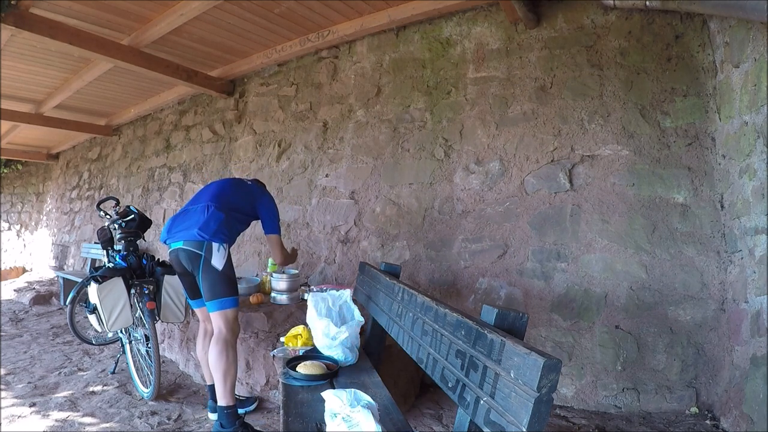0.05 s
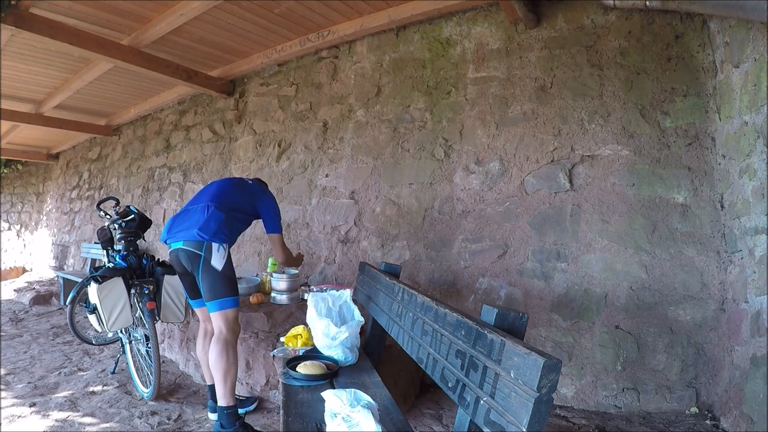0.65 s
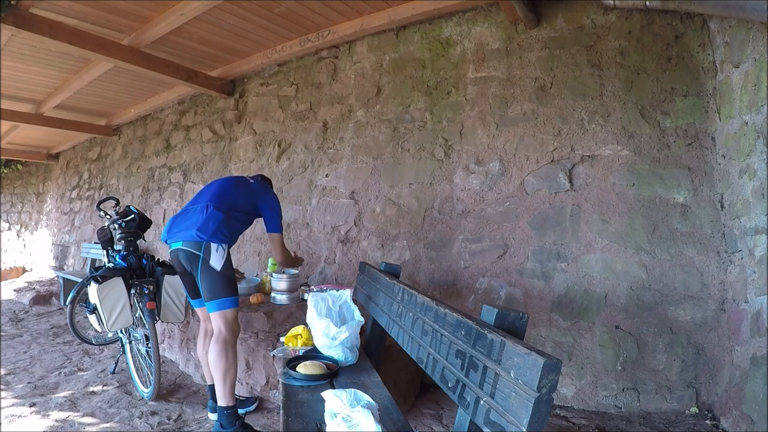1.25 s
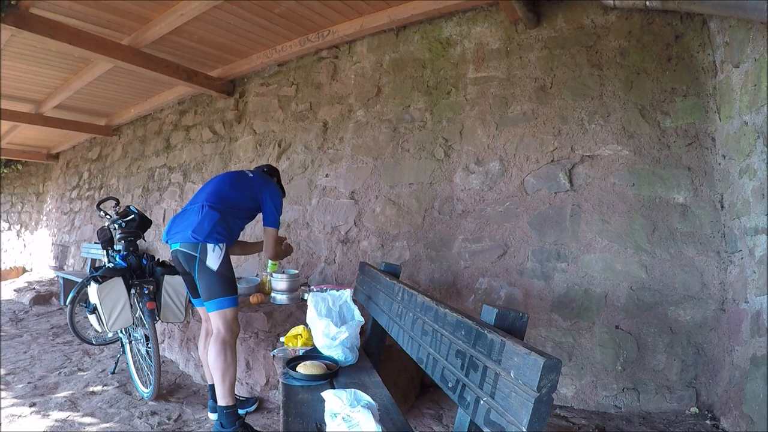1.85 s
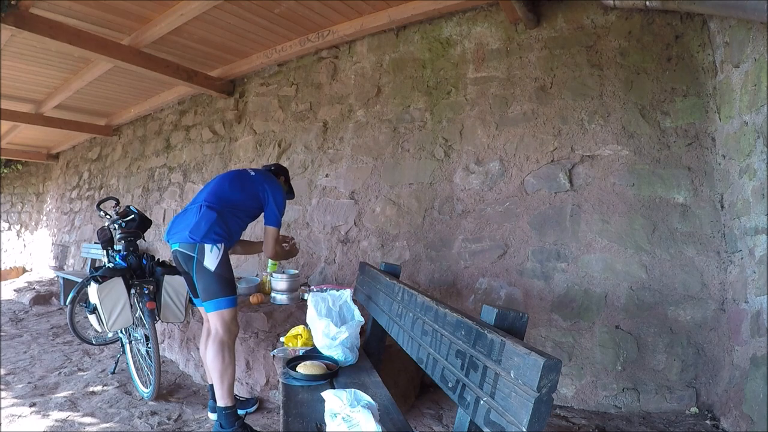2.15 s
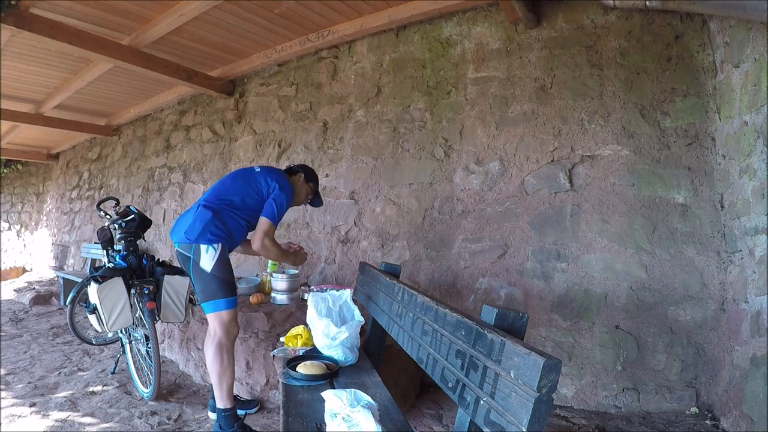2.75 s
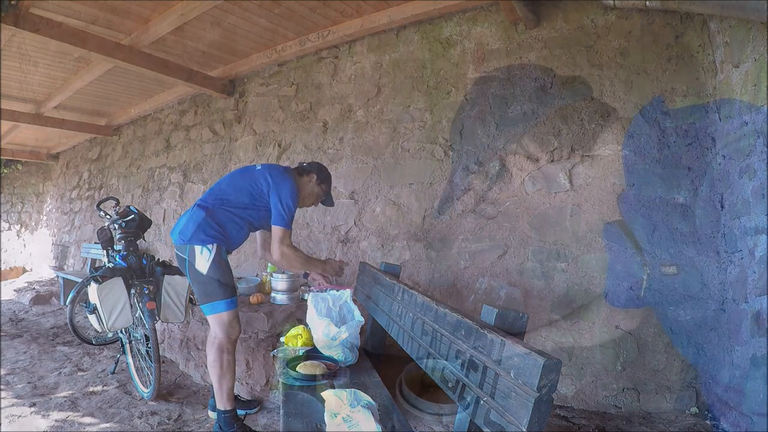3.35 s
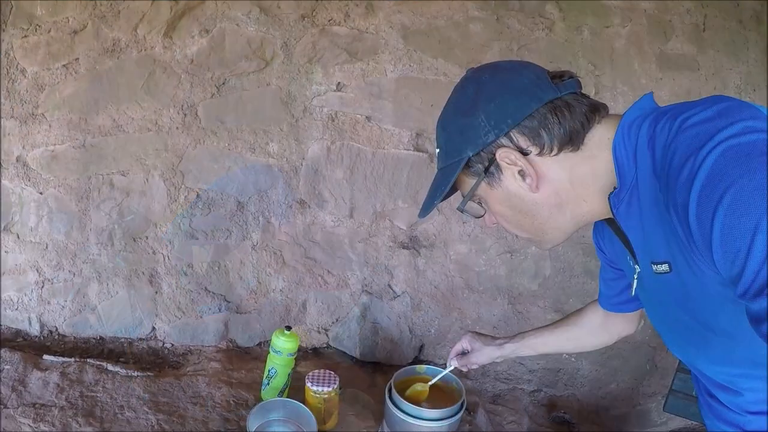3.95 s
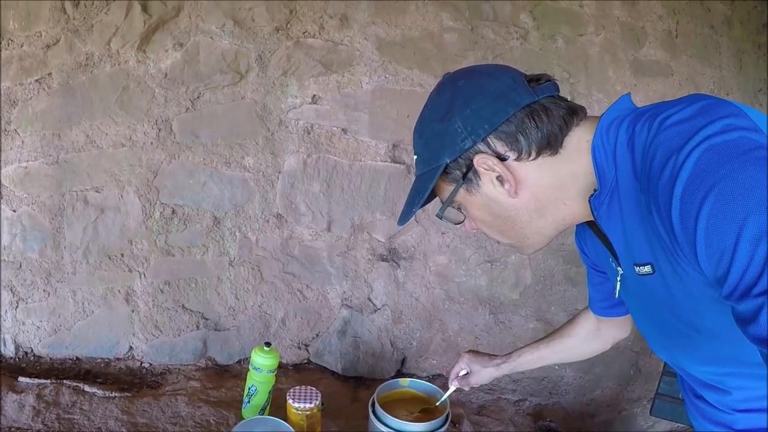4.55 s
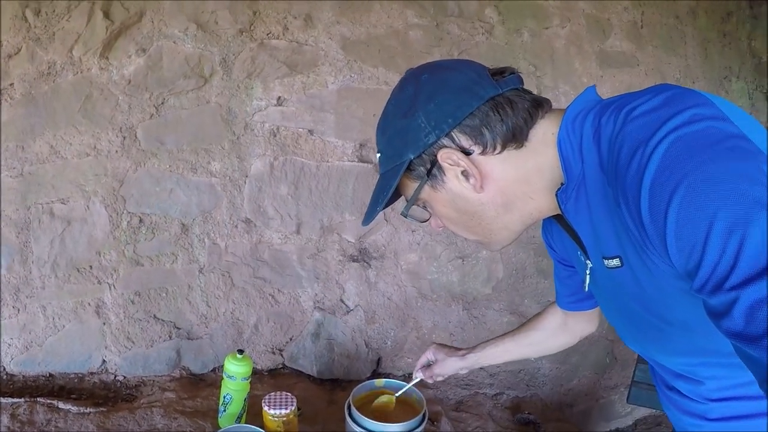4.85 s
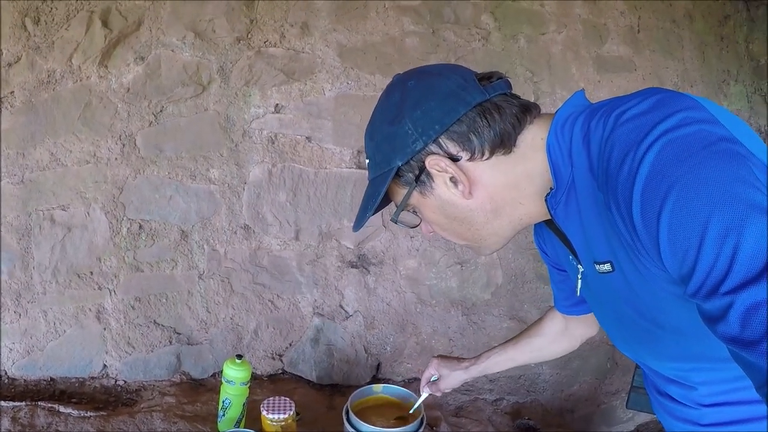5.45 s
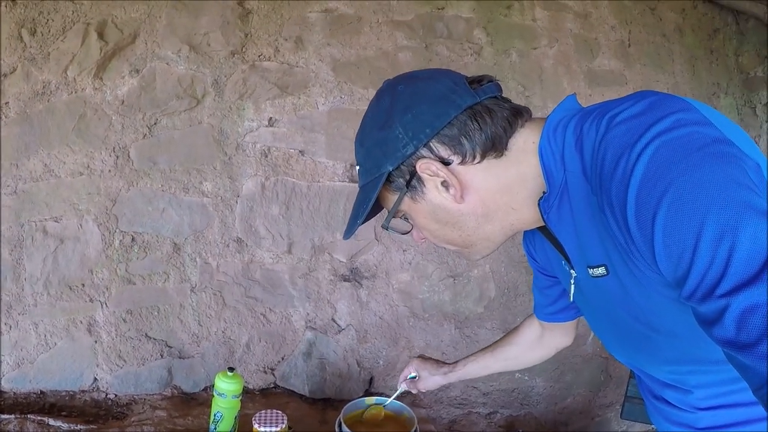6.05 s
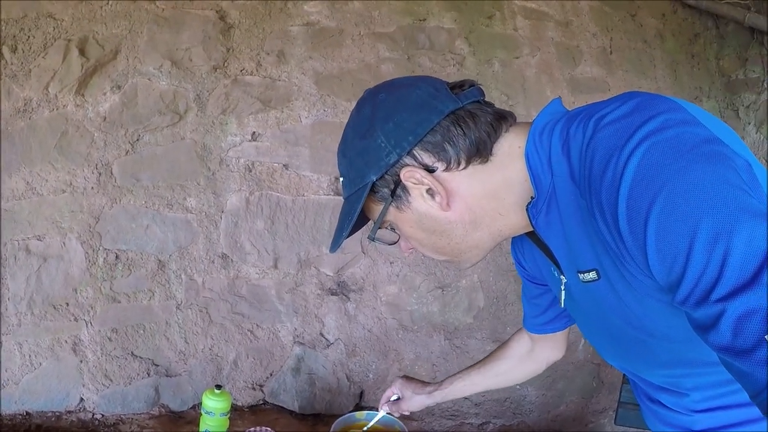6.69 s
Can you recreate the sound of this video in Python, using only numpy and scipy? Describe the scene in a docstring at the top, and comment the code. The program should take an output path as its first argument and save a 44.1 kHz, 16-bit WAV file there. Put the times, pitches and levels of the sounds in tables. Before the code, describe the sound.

Thick soup boils in a metal pot on a camping gas stove under an open stone shelter. Close to the microphone, bubbles glug and plop, small ones snap at the surface, and the flame rumbles low. A little past halfway, the sound shifts to a more distant position with a brief sizzle. The boil is now softer and hollower, and a spoon scrapes, sloshes and lightly knocks the pot.

```python
"""Soup boiling in a metal pot on a camping gas stove, under an open stone shelter.
With the microphone beside the pot, steam bubbles glug through the thick liquid, small ones snap at the
surface and ring the metal, and the flame rumbles below. A more distant position fades in and the close
one is cut off. From back there the stone blurs the boil, and a spoon scrapes, sloshes and knocks."""
import sys
import numpy as np
from scipy import signal
from scipy.fft import rfft, irfft, next_fast_len
from scipy.io import wavfile
from scipy.ndimage import uniform_filter1d, map_coordinates

SR = 44100
rng = np.random.default_rng(int(sys.argv[2]) if len(sys.argv) > 2 else 0)


def to_wav(s):
    """Save 16-bit WAV."""
    ch = np.atleast_2d(s).T  # columns
    pcm = np.round(np.clip(ch, -1, 1) * 32767)  # PCM
    wavfile.write(sys.argv[1], SR, pcm.astype(np.int16))


N = 296352
TIME = np.arange(N) / SR
FAR_IN_S, FAR_FULL_S, CLOSE_CUT_S = 3.1, 3.95, 4.156
TOP_HZ = 15600

# Loud steam bubbles. Each row: start in seconds, level in dB, starting pitch in Hz,
# rise in starting pitches per second, life in seconds.
STEAM_BUBBLES = [(0.118, -32.5, 524.4, 7, 0.0202), (0.143, -24, 373.2, 29, 0.018),
                 (0.159, -35, 466.5, 4.5, 0.019), (0.19, -23, 640, 61.5, 0.0036),
                 (0.205, -34.5, 860, 10.5, 0.0095), (0.205, -23.5, 459.6, 11, 0.015),
                 (0.277, -30.5, 478, 19, 0.0073), (0.289, -28.5, 394.5, 35.5, 0.015),
                 (0.308, -28, 509, 54.5, 0.0051), (0.337, -33.5, 441, 28, 0.0087),
                 (0.393, -29.5, 408, 38.5, 0.0183), (0.423, -27, 458, 4, 0.0146),
                 (0.466, -34.5, 626, 31.5, 0.0185), (0.511, -27.5, 431, 0.5, 0.0175),
                 (0.58, -35, 542.3, 5.5, 0.0217), (0.599, -35, 1298, 5.5, 0.0091),
                 (0.615, -35.5, 447, 4.5, 0.0163), (0.659, -31, 449, 14.5, 0.0154),
                 (0.796, -21, 508, 54.5, 0.00537), (0.908, -27.5, 433.7, 2, 0.0176),
                 (0.949, -30.5, 449, 18, 0.0151), (0.989, -19.5, 642, 14.5, 0.00285),
                 (1.001, -25.5, 368.5, 20.5, 0.0209), (1.026, -42, 452, 8, 0.02),
                 (1.085, -32, 540, 1, 0.0093), (1.096, -31, 415.7, 9.5, 0.0172),
                 (1.142, -33.5, 450.6, 13, 0.0178), (1.193, -31.5, 398, 48.5, 0.0079),
                 (1.266, -32, 603, 58.5, 0.0069), (1.274, -25.5, 586.5, 2, 0.0064),
                 (1.279, -37, 432, 12, 0.019), (1.335, -24, 383.4, 27, 0.01475),
                 (1.437, -24.5, 552, 16, 0.0064), (1.445, -35, 410.4, 3, 0.029),
                 (1.53, -33.5, 413, 2, 0.0266), (1.576, -30.5, 454, 2.5, 0.0076),
                 (1.635, -29.5, 389.4, 1.5, 0.0099), (1.654, -33.5, 561.3, 26.5, 0.0119),
                 (1.682, -35.5, 549.7, 0, 0.0247), (1.69, -26, 394.4, 20.5, 0.0154),
                 (1.712, -35, 564, 41, 0.0115), (1.753, -24, 431, 58.5, 0.0058),
                 (1.823, -38, 498, 5, 0.031), (1.882, -30, 543.6, 14, 0.0161),
                 (1.907, -19, 537, 54.5, 0.00222), (1.924, -32.5, 430, 30, 0.0217),
                 (2.038, -32.5, 470, 17.5, 0.0071), (2.089, -26, 416.6, 3.5, 0.019),
                 (2.23, -24.5, 340.2, 25, 0.0192), (2.25, -27.5, 764, 14.5, 0.0096),
                 (2.262, -37.5, 1083, 17, 0.011), (2.35, -27.5, 326, 20.5, 0.0069),
                 (2.356, -23, 504, 6.5, 0.0097), (2.37, -20.5, 467, 4.5, 0.00427),
                 (2.377, -39, 845, 32, 0.0123), (2.423, -18.5, 583, 1.5, 0.00239),
                 (2.445, -28, 480, 55, 0.0051), (2.523, -24, 521, 2, 0.009),
                 (2.593, -29, 340.2, 27, 0.0212), (2.651, -29.5, 479, 6.5, 0.0086),
                 (2.67, -25, 815, 34.5, 0.00374), (2.724, -26.5, 513, -1.5, 0.0046),
                 (2.745, -37, 407, 26, 0.0446), (2.78, -38.5, 491, 1, 0.0194),
                 (2.823, -36.5, 638.5, 3.5, 0.023), (2.827, -39, 1214, 15, 0.0164),
                 (2.857, -41, 1273, 1.5, 0.007), (2.904, -29, 536, 29.5, 0.0145),
                 (2.918, -30, 729, 21, 0.0092), (2.933, -22, 521, 19, 0.00325),
                 (2.959, -28.5, 857, 7, 0.0048), (2.96, -30.5, 497, 20, 0.0091),
                 (3.02, -37, 1264, 5, 0.0102), (3.07, -29.5, 552, 31.5, 0.0096),
                 (3.084, -27, 420, 46.5, 0.0058), (3.107, -35.5, 574, 64, 0.0092),
                 (3.217, -35.5, 883, 0, 0.0045), (3.217, -19.5, 634, -4, 0.00474),
                 (3.223, -38, 359, 17.5, 0.015), (3.274, -33, 380, 57, 0.007), (3.283, -30, 430, 4, 0.0146),
                 (3.311, -39, 815.4, -2, 0.0218), (3.352, -28, 556.5, 0, 0.0097),
                 (3.402, -26, 523, -3.5, 0.0119), (3.421, -36, 344, 19.5, 0.0198),
                 (3.489, -33.5, 454, 14.5, 0.0166), (3.583, -34, 430, 14.5, 0.016),
                 (3.584, -33, 838, 4.5, 0.011), (3.626, -33.5, 494.3, 2, 0.021),
                 (3.664, -33.5, 448, 12, 0.0062), (3.69, -28.5, 416.7, 14.5, 0.0128),
                 (3.726, -29, 454, 54, 0.0044), (3.748, -27, 716, 54.5, 0.0035),
                 (3.752, -35.5, 423.5, 9, 0.0163), (3.788, -38.5, 835, -4.5, 0.0082),
                 (3.79, -18.5, 479.4, 2.5, 0.00635), (3.8, -39.5, 548, 21, 0.013),
                 (3.817, -29, 592, 8, 0.0092), (3.824, -39.5, 382.2, 9, 0.053),
                 (3.864, -33.5, 434, 10, 0.012), (3.922, -26, 561, -0.5, 0.0064),
                 (4.029, -29.5, 469, 29.5, 0.0063), (4.048, -28.5, 420.3, 4, 0.0178),
                 (4.112, -33, 498, -13, 0.008), (4.132, -29, 448, 15.5, 0.0106),
                 (4.309, -40, 486.2, 2.5, 0.0212), (4.66, -40.5, 404.6, -0.5, 0.0134),
                 (4.806, -41.5, 408, 4.5, 0.0275), (5.359, -40, 674, 3.5, 0.0187),
                 (5.856, -39.5, 475.5, 6.5, 0.0113), (5.93, -46.5, 475, 9.5, 0.0284),
                 (6.015, -39.5, 431.6, 8.5, 0.0144), (6.197, -43.5, 737, -0.5, 0.018),
                 (6.603, -41.5, 523, 15.5, 0.011)]
# Slow bubbles swelling up through the soup, then steam squeaking out through a shrinking film.
# Each row: start in seconds, peak in dB, starting pitch in Hz, end pitch in Hz, length in seconds.
SLOW_BUBBLES = [(0.088, -36.5, 376.7, 477, 0.0444), (0.192, -36, 343.7, 574, 0.05),
                (0.419, -41, 382, 476, 0.06), (0.459, -32, 441.6, 561, 0.036),
                (0.53, -39, 393, 667, 0.0323), (0.588, -38, 426, 962, 0.0435),
                (0.737, -37, 408.7, 744, 0.0655), (0.916, -41, 347.5, 786, 0.0328),
                (0.987, -42, 466, 577, 0.054), (1.212, -38.5, 350, 594, 0.035),
                (1.282, -40.5, 393.3, 668, 0.051), (1.493, -38, 496, 1033, 0.0337),
                (1.81, -35.5, 412, 527.2, 0.0676), (1.808, -42.5, 504.7, 647, 0.042),
                (1.923, -40.5, 444.7, 794, 0.0378), (2.08, -67, 329, 567, 0.057),
                (2.162, -41, 340.1, 673, 0.087), (2.303, -43, 349.3, 715, 0.0747),
                (2.534, -43.5, 523.8, 893.6, 0.073), (2.59, -40, 543.2, 699, 0.061),
                (2.786, -42, 348.3, 702.6, 0.069), (3.18, -38.5, 386.7, 788, 0.0454),
                (3.232, -33.5, 360.3, 729, 0.0505), (3.279, -38.5, 472.8, 581.7, 0.073),
                (3.282, -39.5, 332.4, 418, 0.045), (3.471, -36.5, 401.5, 564.5, 0.0703)]
STEAM_SQUEAKS = [(.66, -44, 3800, 4900, .062), (1.262, -44.5, 2200, 3900, .072)]
# Films bursting close by. Each row: start in seconds, snap in dB, snap centre in Hz,
# splash in dB, spray in dB.
CLOSE_BURSTS = [(0.041, -39, 4460, -49, -46.5), (0.1007, -45.5, 3430, -54.5, -57),
                (0.1245, -52.5, 6000, -60.5, -61.5), (0.141, -43, 6040, -61.5, -55.5),
                (0.1893, -48, 3250, -58, -73.5), (0.2049, -44, 3830, -60.5, -59.5),
                (0.2365, -43.5, 3680, -53, -71), (0.375, -45.5, 2700, -64.5, -45),
                (0.3905, -39, 3570, -67.5, -53.5), (0.404, -50, 3800, -58.5, -49),
                (0.4638, -52.5, 5970, -52.5, -46), (0.5102, -42.5, 4080, -52.5, -55),
                (0.5362, -42, 2920, -65, -53), (0.562, -48.5, 5000, -65.5, -51),
                (0.6, -48.5, 3260, -56, -54), (0.6165, -40.5, 3030, -50.5, -46.5),
                (0.6573, -34.5, 3970, -49, -64), (0.7397, -44.5, 4830, -71.5, -72),
                (0.7946, -48, 3260, -54.5, -59.5), (0.855, -47.5, 5500, -59.5, -67),
                (0.894, -44.5, 3500, -70, -50.5), (0.9876, -48, 3850, -45.5, -56),
                (1.046, -70, 3900, -64, -53), (1.083, -56.5, 3380, -50, -53),
                (1.094, -46, 3450, -64.5, -49), (1.1365, -43, 3920, -61, -49.5),
                (1.1816, -47, 3110, -52.5, -64), (1.263, -41.5, 2310, -65.5, -60),
                (1.3179, -50.5, 3420, -70.5, -71), (1.3628, -44, 5420, -61.5, -67),
                (1.398, -47.5, 4440, -63.5, -61.5), (1.4355, -43, 3100, -50.5, -56),
                (1.5314, -47.5, 5490, -48, -52), (1.5932, -48, 3620, -58, -57),
                (1.6143, -40, 3205, -63.5, -50), (1.634, -63.5, 4500, -68.5, -49),
                (1.729, -51, 2760, -65.5, -57.5), (1.7908, -47.5, 3320, -51, -66),
                (1.8238, -47.5, 3410, -62, -52.5), (1.85, -46.5, 3320, -49.5, -57),
                (1.9639, -48, 2620, -51.5, -54.5), (2.0878, -44, 4150, -55, -55),
                (2.174, -43.5, 3250, -64, -50), (2.228, -44.5, 3830, -49.5, -58.5),
                (2.251, -43.5, 3300, -52, -78), (2.2957, -54, 3930, -51, -51),
                (2.3258, -43.5, 3270, -64.5, -58), (2.3989, -63, 3360, -59, -57),
                (2.4219, -46.5, 2810, -46, -58.5), (2.4785, -43, 3110, -51.5, -61.5),
                (2.523, -52, 2980, -47, -70.5), (2.5561, -53, 4310, -54, -53),
                (2.6489, -50, 3200, -56.5, -53), (2.6801, -42, 4080, -69.5, -73.5),
                (2.7237, -59.5, 3080, -54.5, -61), (2.857, -41.5, 3460, -49, -52),
                (2.958, -47.5, 3530, -53.5, -49.5), (3.0355, -49.5, 3950, -67, -54),
                (3.1058, -51.5, 3270, -67, -69.5), (3.1837, -41, 2990, -51, -77.5),
                (3.2168, -44.5, 3380, -49.5, -48.5), (3.4017, -46.5, 3270, -50.5, -56),
                (3.5573, -44.5, 4300, -63, -65.5), (3.7509, -43.5, 6120, -64.5, -66.5),
                (3.9569, -45.5, 3540, -59.5, -60.5), (4.019, -44, 3500, -65, -68),
                (4.047, -58, 4500, -68, -51), (4.146, -46, 4800, -62, -67)]
# Films bursting farther off. Each row: start in seconds, snap in dB, snap centre in Hz, spray in dB.
FAR_BURSTS = [(4.2804, -55, 6200, -59.5), (4.3964, -52, 6970, -69.5), (4.4511, -51, 3190, -57.5),
              (4.5115, -47.5, 3950, -71), (4.5496, -50.5, 5400, -67), (4.642, -51.5, 4520, -56.5),
              (4.751, -48.5, 4630, -64.5), (4.8, -55.5, 4980, -58), (4.8342, -54, 2790, -54.5),
              (4.992, -57, 3400, -59), (5.0374, -60, 4870, -55), (5.0894, -66.5, 2310, -67.5),
              (5.1502, -47.5, 4140, -62), (5.243, -55.5, 7280, -64.5), (5.2566, -41.5, 4170, -56),
              (5.744, -51, 3620, -63.5), (5.7689, -52, 3390, -69), (5.8395, -49.5, 3810, -60),
              (5.9076, -49.5, 6200, -71.5), (5.9542, -49.5, 2860, -52.5), (6.0571, -58, 4380, -60.5),
              (6.101, -54, 2320, -59.5), (6.502, -48.5, 5600, -63)]
# Spectra of the simmer and of the spray, close and far. Each row: frequency in Hz, relative level in dB.
SIMMER_SPECTRUM = [(110, -30), (160, 0), (220, -14), (290, -2), (480, 5), (800, 1), (1300, -7),
                   (1800, -11.5), (3300, -14), (6000, -20.5), (10000, -28), (15500, -34)]
SPRAY_SPECTRUM = [(600, -29), (1500, -5), (3500, 0.5), (6000, 6.5), (10000, -3.5), (15000, -9)]
FAR_SPRAY_SPECTRUM = [(600, -45.5), (1500, -12), (4000, 1.5), (7000, -1), (10000, -4.5), (15000, -18)]
# Modes of the pot's air and wall, then of spoon and wall damped by the soup.
# Each row: frequency in Hz, relative level in dB, seconds to fall 60 dB.
POT_MODES = [(2290, -8, .11), (2385, -6, .13), (2630, -7, .1), (2735, -5, .11), (3080, -5, .12),
             (3300, 0, .06), (3910, -2, .08), (4010, -3, .11), (4350, -4, .08), (5000, -8, .1),
             (5180, -7, .1), (5810, -8, .04)]
KNOCK_MODES = [(864, -8, 0.037), (1310, -5, 0.038), (1725, 4, 0.073), (2002, -4, 0.06), (2700, -9, 0.039),
               (3250, 3, 0.057), (5160, -11.5, .04)]
# Hollow resonances of the pot in its stone corner. Each row: centre in Hz, width in Hz, gain in dB.
HOLLOW_MODES = [(420, 41, -7.5), (508, 29.2, 1.5), (573.5, 22, 0), (696.1, 55, 3), (915, 43, 1.5),
                (963, 45, -3.5)]
# Spoon strokes. Each row: peak time in seconds, scrape in dB, swish in dB, rise and fade in seconds.
SPOON_STROKES = [(4.18, -55, -55, .03, .03), (4.52, -60, -58, .06, .15), (5.06, -52.5, -63, .08, .09),
                 (5.278, -49.5, -52, .005, .02), (5.39, -51.5, -56, .02, .04), (5.47, -57, -52.5, .06, .08),
                 (5.565, -58, -52.5, .05, .025), (6.225, -56, -55, .03, .02),
                 (6.253, -50.5, -50.5, .006, .018), (6.335, -58, -52.5, .035, .045),
                 (6.47, -58, -57, .04, .05), (6.7, -58, -56, .03, .04)]
# The spoon pushing soup about. Each row: peak time in seconds, level in dB, rise and fade in seconds.
SPOON_SLOSHES = [(4.38, -47.5, 0.0197, 0.02), (4.68, -48, 0.049, 0.053), (5.07, -64, 0.05, 0.058),
                 (5.31, -48.5, 0.0355, 0.07), (5.55, -54.5, 0.04, 0.081), (5.98, -52.5, 0.059, 0.067),
                 (6.2, -49.5, 0.019, 0.055), (6.3, -50, 0.02, 0.029), (6.46, -52, 0.0216, 0.055),
                 (6.65, -49.5, 0.0305, 0.048)]
# The spoon bumping the pot. Each row: start in seconds, level in dB.
SPOON_KNOCKS = [(5.2754, -42), (6.248, -38.5), (6.258, -41)]
# Spectra of the spoon stirring and parting the foam. Each row: frequency in Hz, relative level in dB.
STIR_SPECTRUM = [(200, -29.5), (450, -10), (950, 1.5), (1400, -3), (2000, -6.5), (4000, -20.5),
                 (8000, -43.5)]
SWISH_SPECTRUM = [(1000, -29), (2500, -0.5), (4200, 0), (6500, -0.5), (10000, -9), (15000, -26.5)]
# Resonances of the burner. Each row: centre in Hz, width in Hz, gain in dB.
BURNER_MODES = [(23, 12, -1), (35, 16, 2), (49, 11, -1), (65, 9, -1), (78, 9, -11), (101.5, 13, -4),
                (113, 16, -5), (179, 13, -14), (234, 22, -21), (263, 18, -25)]
# Spectra of the burner at a distance. Each row: frequency in Hz, relative level in dB.
RUMBLE_SPECTRUM = [(11, -9), (24, 4), (35, -4), (46, -2), (52, 6), (58, -3), (63, -2), (69, 5), (75, -6),
                   (90, -14), (118, -13), (130, -22), (150, -20), (190, -24), (210, -42), (260, -38),
                   (570, -120)]
HISS_SPECTRUM = [(120, -6.5), (250, 8.5), (340, 7), (500, -8.5), (650, 3), (950, 7.5), (1500, 5), (2400, 1),
                 (4000, -7.5), (6500, -13), (10000, -18.5), (15500, -20)]
# The distant flame's rumble. Each row: time in seconds, level in dB.
RUMBLE_LEVELS = [(4.2, -37.5), (4.6, -40), (4.9, -37.5), (5.2, -41), (5.9, -38.5), (6.15, -41.5),
                 (6.3, -39.5), (6.72, -40.5)]
# Reverberation under the stone roof. Each row: frequency in Hz, seconds to fall 60 dB.
SHELTER_DECAY = [(150, 0.684), (600, 0.1015), (3000, 0.263), (12000, 0.08)]


def glug(hz, life, rise, attack=0.000688):
    """A steam bubble opens: its cavity rings and climbs in pitch as it shrinks."""
    t = np.arange(SR // 12) / SR
    # the cavity wall trembles, which roughens small, high bubbles most
    tremble = .002 * np.cumsum(noise(len(t))) / np.sqrt(SR)
    envelope = (1 - np.exp(-t / attack)) * np.exp(-(t / life) ** 1.5)
    return envelope * np.sin(2 * np.pi * hz * (t + rise * t * t / 2 + tremble))


def glide(start_hz, end_hz, length, rough):
    """A slowly shrinking cavity: its trembling note swells, climbs and fades."""
    progress = np.linspace(0, 1, round(length * SR))
    hz = start_hz * (end_hz / start_hz) ** progress * (1 + rough * noise(len(progress)))
    return np.sin(np.pi * progress) * np.sin(2 * np.pi * np.cumsum(hz) / SR)


def big_glugs():
    """The loud steam bubbles: quick plops, ringing glugs and slow upward gurgles."""
    out = np.zeros(N)
    for s, db, hz, rise, life in STEAM_BUBBLES:
        add(out, s, amp(db) * glug(hz, life, rise))
    for s, db, start_hz, end_hz, length in SLOW_BUBBLES:
        add(out, s, amp(db) * glide(start_hz, end_hz, length, rough=0.588))
    return out


def small_glugs(count, centre_hz, spread, life, scatter_db):
    """The many lesser bubbles of a rolling boil, rms 1; bigger ones are lower and last longer."""
    out = np.zeros(N)
    for k, (when, strength, pitch, climb) in enumerate(rng.random((count, 4))):
        hz = centre_hz * np.exp(spread * np.log(pitch / (1 - pitch)).clip(-2, 4))
        size = centre_hz / hz
        bubble = amp(scatter_db * strength) * size * glug(hz, life * size, rise=30 * climb)
        add(out, (k + 2 * when) / count * N / SR, bubble)
    return unit(out)


def pop(hz, life, width, attack=0.0006):
    """A film tears and rings the little cavity under it; as much energy as 10 ms at rms 1."""
    t = np.arange(SR // 16) / SR
    foam_trail = amp(-22) * np.exp(-t / .016)
    burst = noise(len(t)) * (np.exp(-t / life) + foam_trail) * (1 - np.exp(-t / attack))
    ring = filtered(burst, lambda f: resonance(f, hz, width * hz) ** 2)
    return ring / np.linalg.norm(ring) * np.sqrt(SR / 100)


def lesser_pops(count, level_db, scatter_db, centre_hz, octaves):
    """Weaker films bursting by chance. Each row: start in seconds, level in dB, centre in Hz."""
    when, size, pitch = rng.random((count, 3)).T
    starts = (np.arange(count) + when) / count * N / SR
    levels = level_db + scatter_db * (2 * size - 1)
    return list(zip(starts, levels, centre_hz * 2 ** (octaves * (pitch - .5))))


def fizz(count, life, scatter_db, spread, colour):
    """Tiny bursts at random moments, each a patch of noise round its own pitch, rms 1."""
    when, size, pitch = rng.random((count, 3)).T
    t = np.arange(SR // 30) / SR
    bands = np.geomspace(1000, 14000, num=13)
    half_band = np.log(bands[1] / bands[0]) / 2
    burst_hz = bands[0] * (bands[-1] / bands[0]) ** (0.054 + .85 * pitch)
    out = np.zeros(N)
    for hz in bands:
        share = np.exp(-(np.log2(hz / burst_hz) / spread) ** 2)
        kicks = np.bincount((when * N).astype(int), share * amp(scatter_db * size ** 3), N)
        band_life = life * (4000 / hz) ** .3  # high bursts are over sooner
        envelope = np.exp(-t / band_life) * (1 - np.exp(-t / .0005))
        band = unit(filtered(noise(), lambda f: np.abs(np.log((f + 1) / hz)) < half_band))
        out += band * signal.oaconvolve(kicks, envelope)[:N]
    return coloured(out, colour)


def surface():
    """Films burst near the microphone with a snap, a lower splash and a spray; all ring the pot."""
    out = np.zeros(N)
    weak = lesser_pops(count=50, level_db=-55.5, scatter_db=3, centre_hz=3200, octaves=1.7)
    bursts = list(CLOSE_BURSTS) + [(s, db, hz, db - 21.5, db - 6.5) for s, db, hz in weak]
    for s, db, hz, splash_db, spray_db in bursts:
        add(out, s, amp(db) * pop(hz, life=.003, width=0.42))
        add(out, s, amp(splash_db) * pop(1150, life=0.002, width=0.9))
        for k, (delay, pitch) in enumerate(rng.random((3, 2))):
            droplet = pop(6500 + 7000 * pitch, life=.0015, width=.5)
            add(out, s + .002 * k * delay, amp(spray_db) / np.sqrt(3) * droplet)
    for s, db, start_hz, end_hz, length in STEAM_SQUEAKS:
        add(out, s, amp(db) * glide(start_hz, end_hz, length, rough=.7))
    # small films spit with a short, broad crack
    for s, db, hz in lesser_pops(count=105, level_db=-55, scatter_db=4, centre_hz=5700, octaves=1.1):
        add(out, s, amp(db) * pop(hz, life=.002, width=.7))
    # flung droplets land with bright ticks
    for s, db, hz in lesser_pops(count=80, level_db=-57, scatter_db=4, centre_hz=7800, octaves=1):
        add(out, s, amp(db) * pop(hz, life=0.002, width=0.4))
    # the tiniest films burst at random moments, and beads of foam tick between them
    fizz_gain = amp(-59) * unit(amp(2.5 * wobble(16)))
    out += fizz_gain * fizz(count=700, life=0.0024, scatter_db=22, spread=0.8, colour=SPRAY_SPECTRUM)
    for s, db, hz in lesser_pops(count=180, level_db=-62.5, scatter_db=6, centre_hz=3000, octaves=1.7):
        add(out, s, amp(db) * pop(hz, life=.004, width=.15))
    return out + amp(-15) * pot_ring(out)


def close_soup():
    """From beside the pot: a seething simmer, glugs and bursts, with a little of the shelter."""
    simmer = amp(-53 + 2.2 * wobble(14)) * coloured(noise(), SIMMER_SPECTRUM)
    glugs = small_glugs(count=420, centre_hz=730, spread=0.17, life=0.009, scatter_db=10)
    squirts = small_glugs(count=150, centre_hz=1090, spread=0.1777, life=0.00181, scatter_db=-1)
    boil = amp(-52) * glugs + amp(-56) * squirts + surface()
    return simmer + boil + amp(-7.5) * shelter(boil)


def far_soup():
    """From farther back: the bursts linger in the pot and the shelter, and the glugs sound hollow."""
    fizz_gain = amp(-62) * unit(amp(2.5 * wobble(22)))
    boil = fizz_gain * fizz(count=1500, life=.003, scatter_db=10, spread=.6, colour=FAR_SPRAY_SPECTRUM)
    for s, db, hz in lesser_pops(count=170, level_db=-63, scatter_db=3, centre_hz=5400, octaves=2.4):
        add(boil, s, amp(db) * pop(hz, life=.005, width=.35, attack=.002))
    glugs = small_glugs(count=520, centre_hz=620.4, spread=0.2414, life=0.00397, scatter_db=4.5)
    boil += amp(-59.5) * pot_hollow(glugs)
    for s, db, hz, spray_db in FAR_BURSTS:
        add(boil, s, amp(db) * pop(hz, life=.009, width=.38, attack=.002))
        add(boil, s, amp(spray_db) * pop(9000, life=.009, width=.6, attack=.002))
    return amp(-1) * boil + amp(-3) * shelter(boil)


def sizzle():
    """A dense crackle of tiny bursts over a broad hiss."""
    crackle = fizz(count=2400, life=0.0087, scatter_db=6.5, spread=0.626, colour=FAR_SPRAY_SPECTRUM)
    return amp(-52) * crackle + amp(-53) * coloured(noise(), HISS_SPECTRUM)


def pot_ring(x):
    """The air and metal wall of the pot ring in answer to x."""
    t = np.arange(SR // 5) / SR
    ring = sum(amp(db - 60 * t / t60) * np.sin(2 * np.pi * hz * t) for hz, db, t60 in POT_MODES)
    return signal.fftconvolve(x, ring / np.linalg.norm(ring))[:N]


def pot_hollow(x):
    """Sound from the soup, coloured by the pot's hollow resonances, rms 1."""
    body = lambda f: sum(amp(db) * resonance(f, hz, width) for hz, width, db in HOLLOW_MODES)
    return unit(filtered(x, lambda f: body(f) + amp(-16)))


def spoon_stir(grain_db=2.2, grain_rate=220):
    """The spoon scrapes the pot, swishes through the foam and churns up soft, low bubbles."""
    rub = coloured(noise(), STIR_SPECTRUM) * amp(grain_db * wobble(grain_rate))
    foam = coloured(noise(), SWISH_SPECTRUM) * amp(grain_db * wobble(grain_rate))
    scrape = rub * swells([(s, db, rise, fade) for s, db, _, rise, fade in SPOON_STROKES])
    swish = foam * swells([(s, db, rise, fade) for s, _, db, rise, fade in SPOON_STROKES])
    churn = small_glugs(count=1800, centre_hz=720, spread=0.25, life=0.006, scatter_db=9)
    churn += amp(-4) * coloured(noise(), STIR_SPECTRUM)
    slosh = amp(-1) * swells(SPOON_SLOSHES) * pot_hollow(churn)
    return scrape + swish + slosh


def spoon_knocks(attack=.0015):
    """The spoon bumps the wall and both ring briefly; the soup cushions the blow."""
    out = np.zeros(N)
    t = np.arange(SR // 8) / SR
    for s, db in SPOON_KNOCKS:
        ring = sum(amp(level + rng.normal(0, 2.2) - 60 * t / t60) * np.sin(2 * np.pi * hz * t)
                   for hz, level, t60 in KNOCK_MODES)
        add(out, s, amp(db - 11.5) * ring * (1 - np.exp(-t / attack)))
        add(out, s, amp(db - 12) * pop(2500, life=.005, width=1.76, attack=attack))
    return out


def close_flame():
    """Just under the pot, the turbulent gas flame drives the low resonances of the burner."""
    body = lambda f: sum((-1) ** k * amp(db) * resonance(f, hz, width)
                         for k, (hz, width, db) in enumerate(BURNER_MODES))
    roar = filtered(noise(), lambda f: body(f) / np.sqrt(1 + (f / 260) ** 4))
    # a steady gas feed evens out the swells
    return amp(-33) * unit(roar / running_rms(roar, 6000) ** 0.2)


def far_flame():
    """The burner at a distance: a low rumble under a steady hiss."""
    roar = coloured(noise(), RUMBLE_SPECTRUM)
    level_db = np.interp(TIME, *np.transpose(RUMBLE_LEVELS))
    rumble = amp(level_db) * unit(roar / np.sqrt(running_rms(roar, 4000)))
    hiss = amp(-55.8 + 1.2 * wobble(9)) * coloured(noise(), HISS_SPECTRUM)
    return rumble + hiss


def shelter(x):
    """Stone wall and roof answer; four tails take turns, so the echo varies from moment to moment."""
    out = np.zeros(N)
    for k in range(4):
        hz, t, spectra = signal.stft(noise(SR // 2), SR, nperseg=256)
        decay = amp(-60 * t / along(SHELTER_DECAY, hz)[:, None])
        tail = signal.istft(spectra * decay, SR, nperseg=256)[1]
        tail = np.pad(tail / np.linalg.norm(tail), (180, 0))  # 4 ms behind the direct sound
        turn = np.floor(TIME * 7) % 4 == k
        share = uniform_filter1d(turn.astype(float), size=400)
        out += signal.fftconvolve(x * share, tail)[:N]
    return out


def swells(rows):
    """The gain of overlapping strokes, each rising to its peak and dying away."""
    return np.sqrt(sum(amp(db) ** 2 * np.exp(-2 * np.maximum((s - TIME) / rise, (TIME - s) / fade))
                       for s, db, rise, fade in rows))


def amp(db):
    """Decibels to gain."""
    return 10 ** (np.asarray(db) / 20)


def unit(x):
    """Scale to rms 1."""
    return x / np.sqrt(np.mean(x ** 2) + 1e-20)


def running_rms(x, samples):
    """The level of x over a sliding window."""
    return np.sqrt(np.abs(uniform_filter1d(x ** 2, size=samples)))


def along(points, hz):
    """Interpolate (Hz, value) points on a log frequency axis."""
    point_hz, values = np.transpose(points)
    return np.interp(np.log(hz + 1), np.log(point_hz + 1), values)


def filtered(x, response):
    """x through a frequency response."""
    size = next_fast_len(len(x) + 8192)
    return irfft(rfft(x, size) * response(np.fft.rfftfreq(size, 1 / SR)), size)[:len(x)]


def coloured(x, spectrum):
    """x shaped by a spectrum, at rms 1."""
    return unit(filtered(x, lambda hz: amp(along(spectrum, hz))))


def resonance(hz, centre, width):
    """Causal response of one resonance."""
    return 1j * hz * width / (centre ** 2 - hz ** 2 + 1j * hz * width)


def noise(count=N):
    """White noise."""
    return rng.standard_normal(count)


def wobble(rate):
    """A smooth random curve, read so slowly that it stays almost constant over the whole scene."""
    return map_coordinates(noise(int(N * rate / SR) + 4), [TIME * rate / SR])


def add(track, s, sound):
    """Mix a sound into the track at s seconds."""
    part = track[max(0, round(s * SR)):][:len(sound)]
    part += sound[:len(part)]


def scene():
    """Two microphone positions in mono: the distant one fades in, the close one ends abruptly."""
    close = np.clip((CLOSE_CUT_S - TIME) / .004, 0, 1)
    far = np.interp(TIME, [FAR_IN_S, FAR_FULL_S], [0, 1])
    overlap_sizzle = far ** 0.037 * close * sizzle()  # only while both positions sound
    glugs = big_glugs()
    # at a distance, more of each glug arrives by way of the wall
    echo = shelter(glugs * (amp(-12.5) * close + amp(-11.5) * (1 - close)))
    direct = glugs * (close + amp(-2.5) * (1 - close))
    close_mic = close_flame() + close_soup()
    far_mic = far_flame() + far_soup() + spoon_stir() + spoon_knocks()
    return (close * close_mic + far * far_mic + overlap_sizzle + direct + echo)[None]


def record(dry):
    """The microphone chain passes nothing above its band limit."""
    return np.array([filtered(channel, lambda hz: hz < TOP_HZ) for channel in dry])


dry = scene()
out = record(dry)
to_wav(out)
```